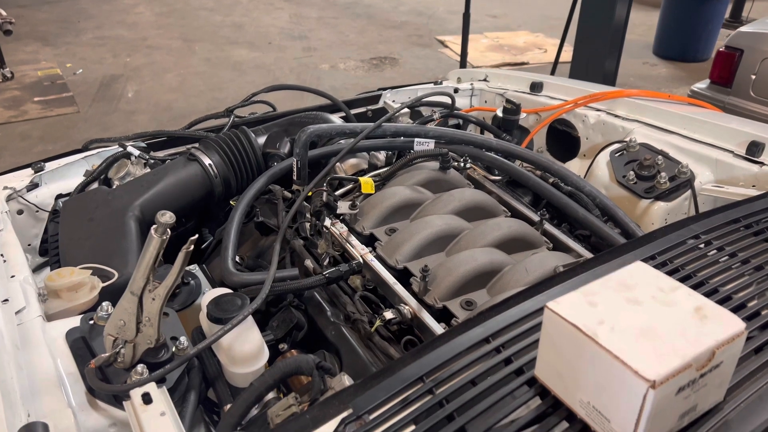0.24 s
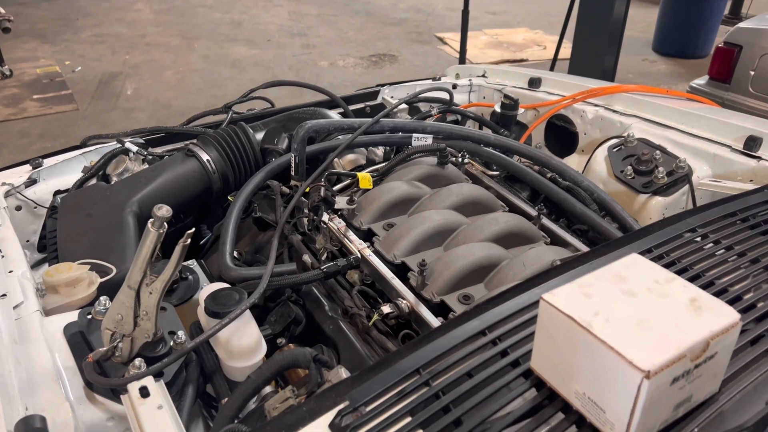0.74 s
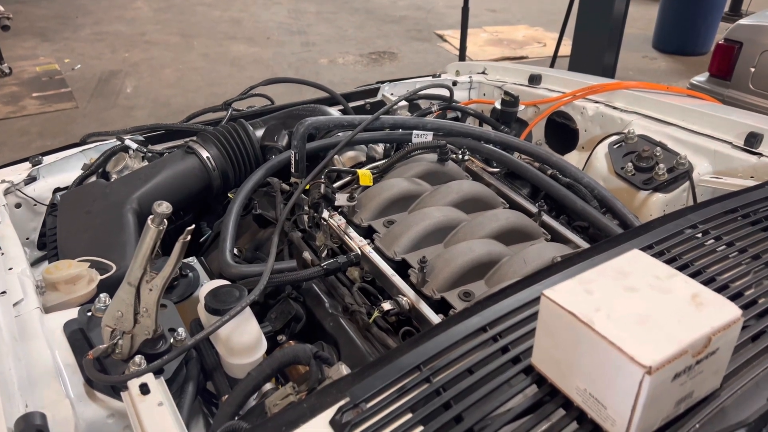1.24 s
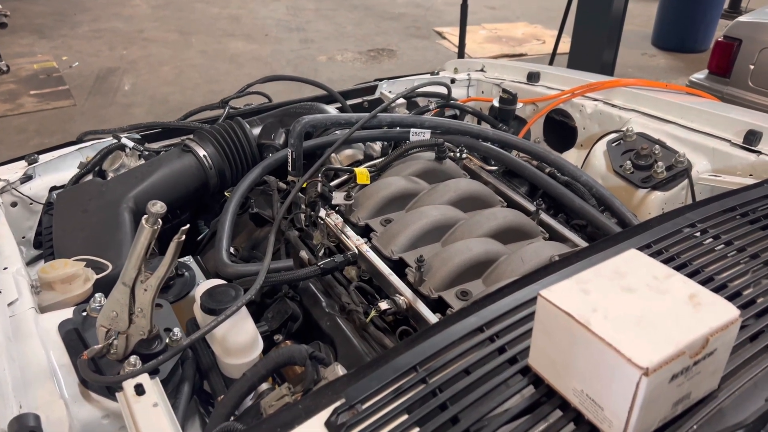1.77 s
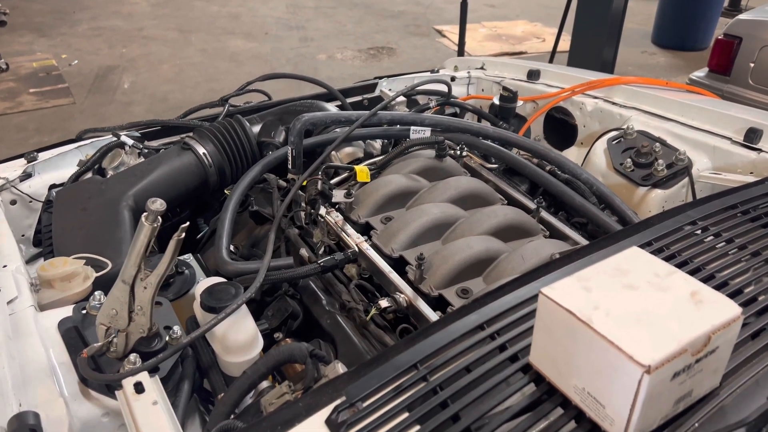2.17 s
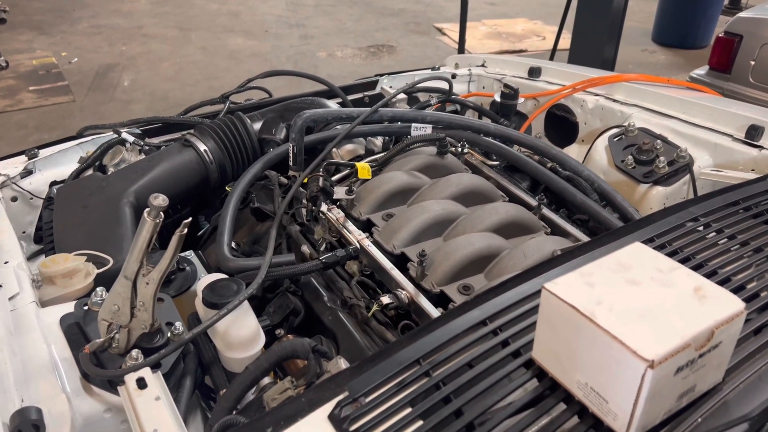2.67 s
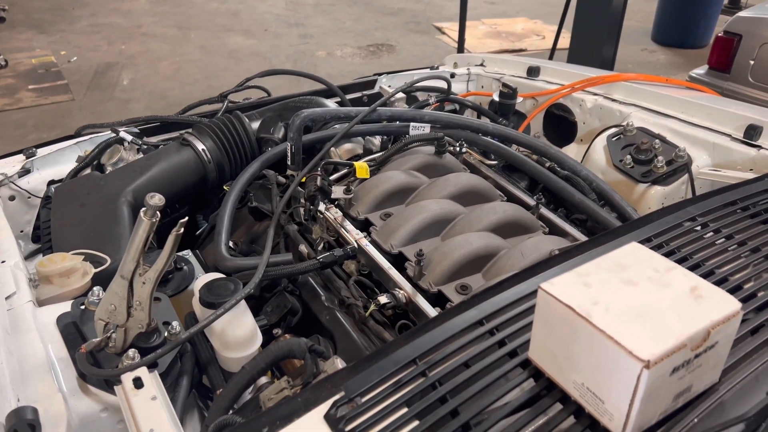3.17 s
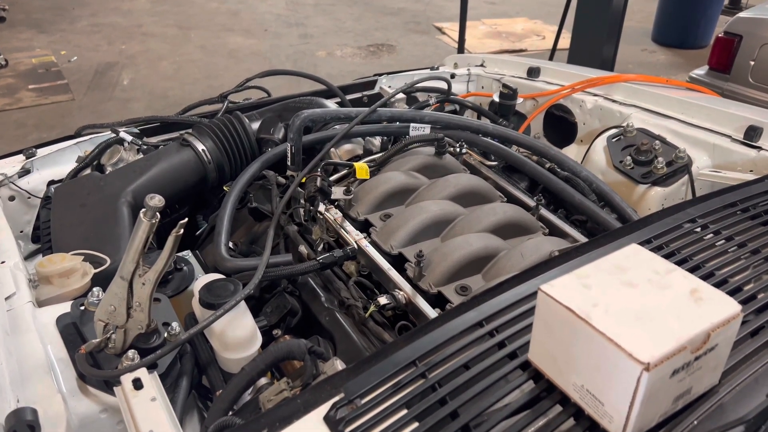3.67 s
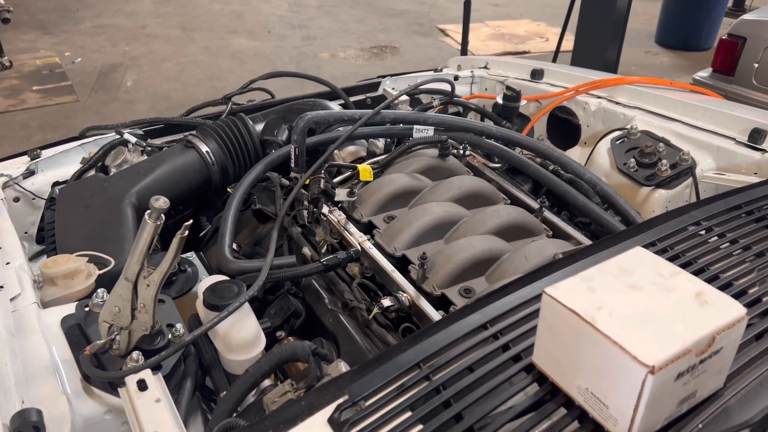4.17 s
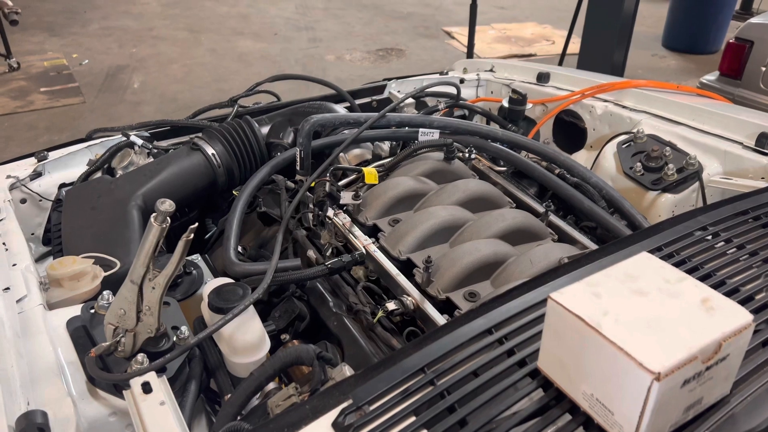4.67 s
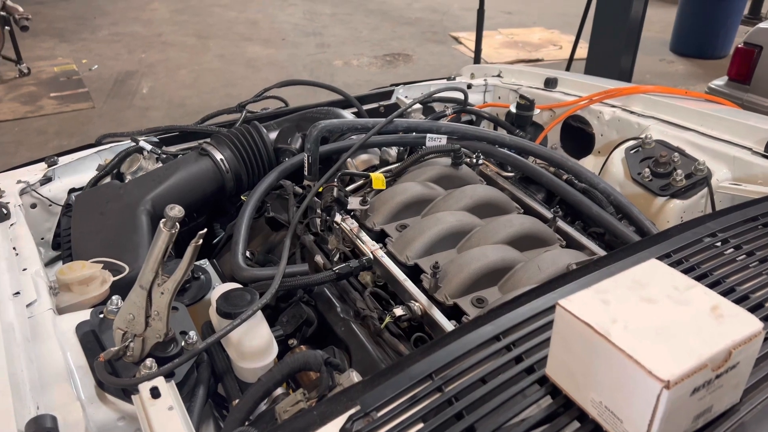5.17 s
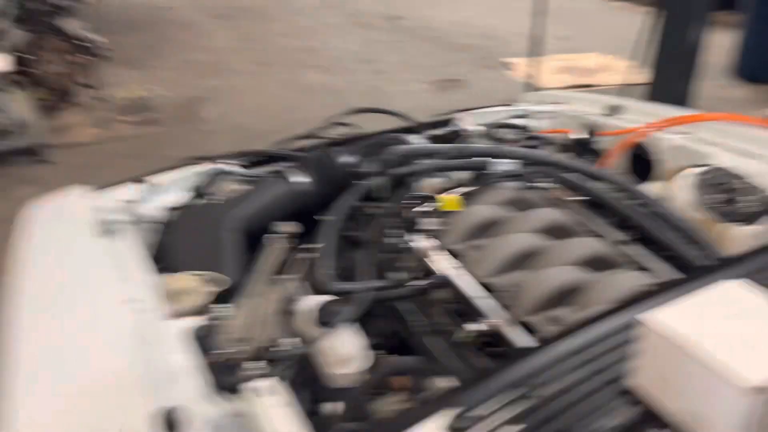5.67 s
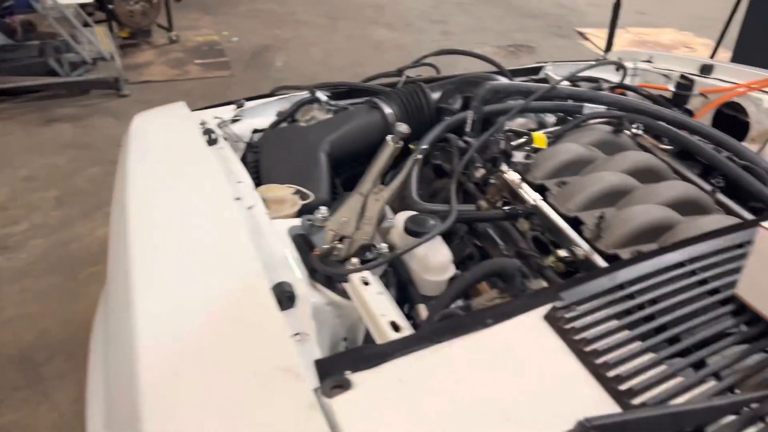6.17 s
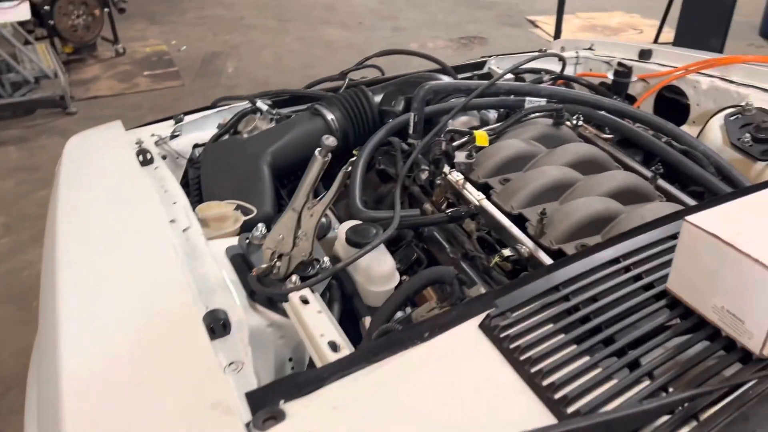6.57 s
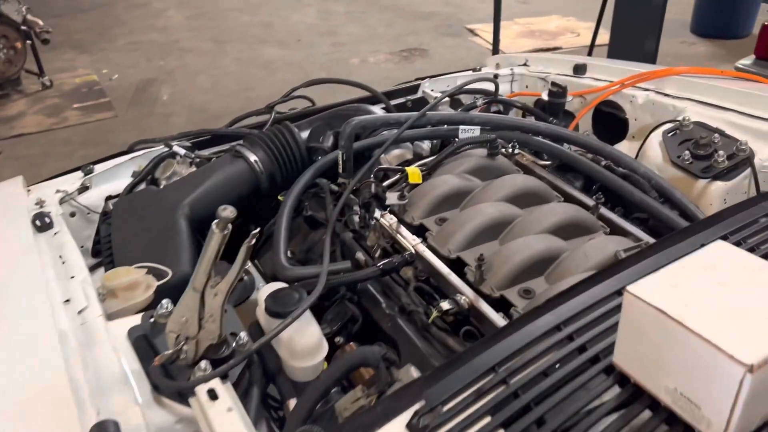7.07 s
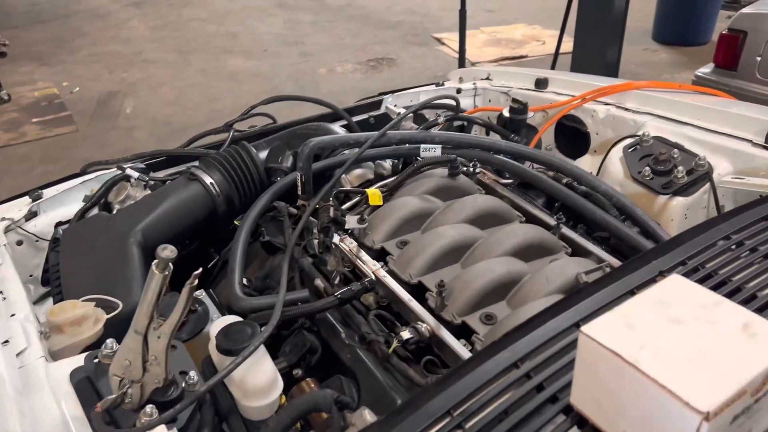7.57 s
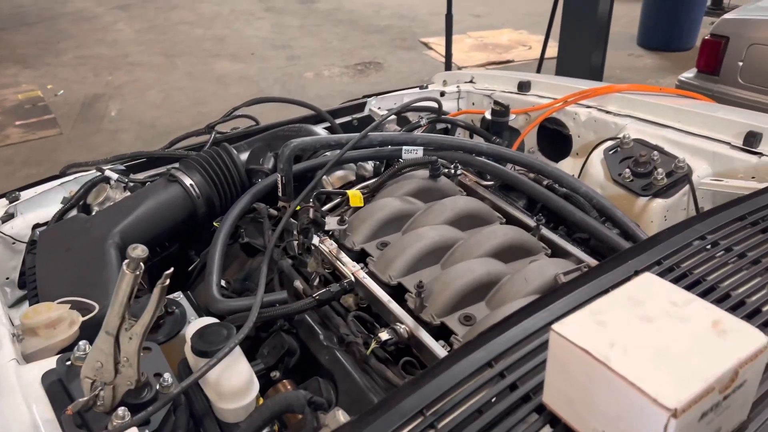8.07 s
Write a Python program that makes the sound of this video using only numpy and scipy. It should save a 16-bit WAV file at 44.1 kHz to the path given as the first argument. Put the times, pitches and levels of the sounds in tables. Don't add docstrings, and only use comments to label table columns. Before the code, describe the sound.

In a garage, a car engine cranks rhythmically for five seconds, sputters, winds down with faint belt whistles, and after a pause is cranked once more.

```python
import sys
import numpy as np
from scipy import signal
from scipy.fft import rfft, irfft, next_fast_len
from scipy.io import wavfile
from scipy.ndimage import uniform_filter1d

SR = 44100
rng = np.random.default_rng(int(sys.argv[2]) if len(sys.argv) > 2 else 0)


def store_pcm(level_fs):
    pcm = np.round(np.clip(level_fs, -1, 1) * 32767).astype(np.int16)
    wavfile.write(sys.argv[1], SR, np.atleast_2d(pcm).T)


def gain_from_decibels(decibels):
    exponent = np.asarray(decibels, float) / 20
    return 10 ** exponent


N = 366912
SIZE = next_fast_len(N + SR)
HZ = np.maximum(np.arange(SIZE // 2 + 1) * SR / SIZE, 1)
T = np.arange(N) / SR
LAG_S = 0.000246

# (time [s], strokes turned [eight make a cycle])
CRANK_TURNS = [(.27, -4.9), (.486, -2.7), (.585, -1.95), (.776, 0), (1.1, 3.835), (1.432, 8), (2.069, 16),
               (2.717, 24), (3.370, 32), (4.024, 40), (4.679, 48), (5.24, 54.85), (5.6, 64), (6.3, 74),
               (8.12, 75.6), (8.32, 77.3)]
# (gear level [dB], intake gulp level [dB], whine level [dB])
CYLINDER_LOADS = [(5.5, 11, -3), (1.5, -1, 1), (-5, -6, 5.5), (-0.5, 6.5, -9), (-2, 4, 4), (-3, 2, -0.5),
                  (-4, -17, -2.5), (-0.5, -3.5, 3.5)]
CYLINDER_LOAD_PLACES = [(-.02, .04), (.98, .95), (1.9, 1.9), (3.03, 2.99), (3.95, 4.04), (5.02, 4.98),
                        (6.06, 6.05), (7.07, 7.05)]
# (time [s], level [dB], pipe ring [Hz], bark level [dB])
ENGINE_FIRINGS = [(5.278, -15, 113, -22), (5.299, -10.5, 107.4, -12), (5.338, -13.5, 77.7, -34),
                  (5.399, -14, 95.4, -27), (5.46, -11, 70.5, -31), (5.51, -12, 92, -44),
                  (5.56, -8.5, 96, -21.5), (5.599, -12.5, 87.5, -22), (5.659, -12.5, 108.7, -30),
                  (5.726, -15, 83, -45), (5.777, -17, 96.6, -40), (5.829, -15, 84.9, -33),
                  (5.869, -13, 86.4, -31), (5.942, -13, 83.6, -33.5), (6.02, -22, 83.2, -42),
                  (6.099, -25.5, 75, -39.5), (6.196, -28.5, 83, -38.5), (6.271, -44, 94.5, -56),
                  (6.349, -42, 96.6, -45)]
# (frequency [Hz], width [Hz], lift
# [dB])
STARTER_MODES = [(255, 20, 5), (410, 40, 3), (672, 40, 4), (841, 28, 11), (1244, 60, 5), (1510, 60, 3),
                 (2810, 80, 5), (3070, 90, 2), (3500, 100, 4.5), (4190, 57, 3), (5290, 100, 2),
                 (6790, 290, 3)]
# (frequency [Hz], left minus right [dB])
LEFT_TILT = [(60, -2.5), (110, 1), (200, -0.5), (550, -0.5), (740, 2.5), (950, 3.5), (1290, 6), (2380, 0.5),
             (4400, 4), (6300, 9), (6850, 9), (7600, 5), (9000, -0.5), (15000, 0.5)]


def on_hz(table):
    hz, value = np.transpose(table)
    return np.interp(np.log(HZ), np.log(hz), value)


def over_time(table):
    return np.interp(T, *np.transpose(table))


def colour(x, gain):
    return irfft(rfft(x, SIZE) * gain, SIZE)[..., :N]


def lift(modes):
    return gain_from_decibels(sum(db / (1 + (2 * (HZ - hz) / width) ** 2) for hz, width, db in modes))


def level(x, db):
    return x * gain_from_decibels(db) / np.sqrt(np.mean(x ** 2))


def add(out, s, x):
    i = int(s * SR)
    out[..., i:i + x.shape[-1]] += x[..., :N - i]


def ring(hz, t60, rise):
    t = T[:int(t60 * SR)]
    return np.sin(2 * np.pi * hz * t) * gain_from_decibels(-60 * t / t60) * (1 - np.exp(-t / rise))


def drift(size, smooth):
    return size * uniform_filter1d(rng.standard_normal(N), smooth)


def slow(s):
    return np.interp(s, [.45, .7, .95], [1.9, 1.6, 1])


def bursts(rows, rise, fall, order=1):
    out, t = np.zeros(N), T[:SR // 2]
    for s, db in rows:
        fade = np.exp(-(t / (fall * slow(s))) ** order)
        add(out, s, gain_from_decibels(db) * (1 - np.exp(-t / rise)) * fade)
    return out


def strokes(place):
    s, turned = np.transpose(CRANK_TURNS)
    at = place + 8 * np.arange(-1, 7)
    at = at[(at > -3.6) & (at < 55.2)]
    return np.interp(at, turned, s)


def each_cycle(rows, spread_db=0, after=0):
    return [(s, db + spread_db * rng.standard_normal())
            for place, db in rows for s in strokes(place) if s > after]


def load_swells(place_column, column):
    rows = [(at[place_column], row[column]) for at, row in zip(CYLINDER_LOAD_PLACES, CYLINDER_LOADS)]
    return each_cycle(rows, 1)


def cyclic(share):
    cycle = .654 * SR
    place = (over_time(CRANK_TURNS) % 8 / 8 * cycle).astype(int)
    share = share * (T < 5.25)
    returning = rng.standard_normal((3, int(cycle) + 1))[:, place]
    return np.sqrt(share) * returning + np.sqrt(1 - share) * rng.standard_normal((3, N))


def late():
    # (frequency [Hz], phase [rad])
    low_mid_lead = [(150, 0), (450, .3), (690, .8), (900, .2), (1300, 0)]
    treble = np.clip(HZ / 1000 - 1, 0, 1)
    return np.exp(1j * on_hz(low_mid_lead) - 2j * np.pi * HZ * LAG_S * treble)


def ports(gate, gain, shared=0, repeat=0):
    # (frequency [Hz], likeness of the ports [0-1])
    likeness = [(60, 1), (290, 0.85), (640, 0.5), (900, 0), (1500, 0.06), (3300, 0.35), (6000, 0),
                (9000, 0.9), (15000, 1)]
    noise = cyclic(repeat) + shared * np.array([[1], [0], [0]])
    common, left, right = rfft(gate * noise, SIZE) * gain
    alike, tilt = np.clip(on_hz(likeness), 0, 1), gain_from_decibels(on_hz(LEFT_TILT) / 2)
    pair = np.sqrt(alike) * common * [late(), HZ ** 0]
    pair = pair + np.sqrt(1 - alike) * np.array([left, right])
    return irfft(pair * [tilt, 1 / tilt], SIZE)[:, :N]


def garage():
    # (frequency [Hz], level [dB per Hz])
    rumble = [(15, -55), (25, -13.5), (53, -8), (91, -14.5), (124, -16.5), (149, -26), (183, -19.5),
              (314, -38), (906, -40), (979, -35.5), (1170, -37.5), (3500, -47), (5820, -45), (12000, -70),
              (15600, -99), (22000, -120)]
    # (frequency [Hz], level [dB])
    hum_lines = [(70.0, -70), (118.4, -62), (1001, -84.5), (1809, -87.5), (2010, -92), (5001, -85),
                 (6002, -90.5), (7004, -88.5)]
    # (time [s], 1 kHz line level [dB], level of the lines above [dB])
    coil_levels = [
        (0, -1, -21),
        (5.9, 8, -19),
        (6.64, 16, -4),
        (6.68, 3, -4),
        (6.9, 5, 2.5),
        (7.7, 2, -4),
        (7.85, -11, -7),
    ]
    swell = uniform_filter1d(np.repeat(rng.standard_normal(N // 8000 + 1), 8000)[:N], 8000)
    s, low_db, high_db = np.transpose(coil_levels)
    hum = 0
    for hz, db in hum_lines:
        coil_db = np.interp(T, s, low_db if hz < 1100 else high_db) * (hz > 500)
        line_db = db + 6.5 + drift(60, 1500) + coil_db
        hum = hum + gain_from_decibels(line_db) * np.sin(2 * np.pi * hz * T)
    return level(ports(gain_from_decibels(0.58 * swell), gain_from_decibels(on_hz(rumble))), -53) + hum


def knocks():
    # (time [s], level [dB], frequency [Hz], t60 [s], left minus right [dB])
    heavy_knocks = [(0.212, -49, 1800, 0.12, 3), (.28, -52, 72, 0.77, -15), (0.667, -33, 1430, 0.16, 2),
                    (5.233, -22, 750, 0.041, 0), (5.233, -29, 1500, 0.045, -2),
                    (5.233, -28, 3020, 0.042, -4), (5.265, -36, 560, 0.046, 5),
                    (5.294, -14, 490, 0.031, 0.5), (5.294, -26, 1270, 0.033, 8),
                    (5.312, -35.5, 1500, 0.19, 7), (5.333, -35, 1090, .05, 2), (5.381, -30, 2000, .04, 0),
                    (5.414, -40, 695, 0.054, 2), (5.464, -29, 1500, 0.04, 2), (.693, -30, 1260, 0.14, 2),
                    (.861, -29, 1190, 0.093, -5), (1.11, -25.5, 560, 0.044, 2), (5.57, -34, 1130, 0.11, 11),
                    (5.712, -30, 1010, 0.053, -2), (6.722, -44, 700, 0.071, 0),
                    (7.92, -60, 789, 0.14, -1.0), (8.313, -36, 1110, 0.12, 8)]
    narrow_scuffs = [(.29, -35.5, 200, .1, 0.5), (.47, -32, 420, 0.16, -1), (.585, -33, 312, 0.075, -1),
                     (8.128, -28, 282, 0.082, -3), (0.219, -45, 520, .1, -2), (8.163, -33, 130, .1, -2),
                     (8.193, -39, 170, 0.068, 0), (8.235, -36, 198, 0.073, 2), (8.275, -36, 190, 0.12, 2),
                     (0.192, -53, 467, 0.3, -4), (5.464, -31, 630, 0.086, 3), (7.218, -60, 1970, 0.41, 2),
                     (7.765, -69, 1700, 0.38, 0), (7.82, -63, 1690, .2, 0)]
    tonal_pings = [(.4, -34.5, 574, 0.23, 0), (.43, -29, 855, 0.19, 1), (.57, -29.5, 660, 0.15, -2),
                   (.6, -29.5, 860, 0.18, 4), (.645, -29.5, 675, .15, 0), (0.66, -38, 665, .12, -1),
                   (8.15, -29, 1090, 0.088, 3), (8.21, -40, 695, .3, -5), (8.215, -36, 432, .25, -5),
                   (8.2, -46, 4200, .3, 7), (5.266, -29, 4760, 0.09, 3), (6.571, -40, 474, 0.1, -2),
                   (6.727, -47, 748, 0.13, 0), (6.727, -49, 465, 0.11, 0), (.217, -41.5, 1150, .07, 9),
                   (6.63, -53.5, 480, .1, 0), (7.24, -70, 1810, 0.66, 0), (8.05, -46, 469, 0.11, -3),
                   (8.05, -65, 7300, .06, 0)]
    t = T[:SR // 2]
    for rows, spread in (heavy_knocks, 0.37), (narrow_scuffs, 0.11), (tonal_pings, 0.033):
        for s, db, hz, t60, pan_db in rows:
            band = signal.butter(2, [hz / (1 + spread), hz * (1 + spread)], "band", fs=SR, output="sos")
            common = rng.standard_normal(len(t))
            hit = signal.sosfilt(band, common + rng.standard_normal((2, len(t))))
            fade = gain_from_decibels(-60 * t / t60) * (1 - np.exp(-t / 0.00059))
            pan = gain_from_decibels(np.array([[pan_db], [-pan_db]]) / 2)
            yield s, level(hit, db) * fade * pan


def hits():
    out = np.zeros((2, N))
    for s, hit in knocks():
        add(out, s, hit)
    return out


def drive():
    # (time [s], level [dB])
    effort = [(.245, -27.5), (.275, -3.5), (.56, -2.5), (.6, -1.5), (1.0, 1), (5.1, -0.74), (5.39, -2),
              (5.5, -5), (5.92, -9.5), (6.17, -19.5), (6.75, -25), (6.95, -30.5), (7.18, -39), (7.4, -47),
              (8.09, -38), (8.128, -4.5), (8.2, -3.5), (8.32, -7)]
    # (level at steady cranking [dB], slope [dB per dB of effort])
    response = [(-29.5, 1.07), (-32.5, 1.34), (-32.5, 1.2)]
    # (time [s], gulp [dB], gear [dB], whirr [dB])
    jolts = [(0.26, -60, -36.5, -26), (.29, -42, -70, -66), (5.36, -27, -52, -37.5), (5.48, -28, -59, -53),
             (.46, -35, -56, -50.5), (5.231, -39, -49, -31), (5.262, -8, -55, -50),
             (5.316, -13.5, -28, -38), (5.597, -18.5, -28.5, -33.5), (5.764, -34, -58, -47),
             (6.2, -44, -66, -64), (8.118, -50, -26.5, -25)]
    effort_db = over_time(effort)
    s, *jolt_columns = np.transpose(jolts)
    out = []
    for (db, slope), jolt_db in zip(response, jolt_columns):
        jolt = bursts(zip(s, jolt_db), 0.011, 0.023, order=2)
        out.append(20 * np.log10(gain_from_decibels(db + slope * effort_db) + jolt))
    return out


def throb(column, rise, fall, rest_db):
    # (time [s], throb depth [0-1])
    throb_depth = [
        (.37, 0.16),
        (.49, 0),
        (.56, 0.75),
        (1.0, 0.78),
        (5.1, 0.6),
        (5.25, 0.6),
        (5.9, 0),
        (6.75, 0.4),
    ]
    rows = load_swells(0, column) + [(s, -3) for s, *_ in ENGINE_FIRINGS]
    swell = gain_from_decibels(rest_db) + bursts(rows, rise, fall, order=2)
    steady = swell / np.sqrt(uniform_filter1d(swell ** 2, SR // 5))
    return steady ** np.clip(over_time(throb_depth), 0, 1.5)


def tooth_phase(sag):
    # (time [s], rate [Hz])
    tooth_rate = [
        (.27, 190),
        (.44, 280),
        (.63, 282),
        (.74, 310),
        (.86, 415),
        (2, 421),
        (3.5, 417),
        (5.3, 420),
        (8.1, 190),
        (8.32, 290),
    ]
    strain = sag * np.cos(2 * np.pi * (over_time(CRANK_TURNS) - .03))
    wander = .2 * uniform_filter1d(cyclic(.7)[0], 900)
    return np.cumsum(over_time(tooth_rate) * (1 + strain + wander)) / SR


def machine(mesh):
    # (frequency [Hz], level [dB per Hz])
    gulp_spectrum = [(65, -10.5), (110, -3.5), (156, -14), (204, -4), (258, -15), (345, -12.5), (424, -18),
                     (465, -12), (600, -22.5), (780, -39.5), (1320, -120)]
    gear_spectrum = [(290, -34.5), (500, -12), (766, -2.5), (834, -7), (903, -3), (1010, -2), (1260, 2.5),
                     (2400, -8), (3120, -56.5), (5280, -120)]
    whirr_spectrum = [(1200, -7.5), (2000, -4), (3500, -5.5), (5400, -7.5), (8000, -12), (11500, -16),
                      (13000, -26.5), (14500, -26), (15600, -14), (16000, -47), (17000, -82.5)]
    # (frequency [Hz], width [Hz], lift [dB])
    cover_modes = [(2320, 13, -10.5), (2650, 46, 4.5), (3320, 50, 4), (3820, 35, 3), (4060, 200, -3),
                   (4440, 44, 0), (5300, 30, 5), (5500, 60, 3.5), (6480, 97, 4), (7270, 280, -5)]
    # (frequency [Hz], width [Hz], lift [dB])
    free_modes = [(190, 210, 3.5), (700, 89, 8), (1440, 31, 5.5), (2000, 40, 0.5), (5960, 1300, 1.5),
                  (9140, 1000, 2.5), (12000, 3000, 3.5), (15100, 1500, 7)]
    # (frequency [Hz], width [Hz])
    dropped_bands = [(10250, 1000), (13700, 1150)]
    meshed = uniform_filter1d(1. * ((T < 5.3) | (T > 8)), 2000)
    mesh = mesh + 2.3 * uniform_filter1d(cyclic(.8)[0], 200)
    teeth = level(np.diff(np.floor(mesh), prepend=0) > 0, 0.84)
    rattle = 3.6 * cyclic(1)[0]
    gaps = np.prod([np.clip(np.abs(2 * (HZ - hz) / width), .02, 1) ** 8 for hz, width in dropped_bands], axis=0)
    parts = ((gulp_spectrum, throb(1, 0.002, 0.088, -14.5), rattle, .85),
             (gear_spectrum, throb(0, 0.008, 0.038, -19), teeth, .8),
             (whirr_spectrum, throb(0, 0.011, 0.031, 1.3), 0, .35))
    out = 0
    for (spectrum, gate, shared, repeat), db in zip(parts, drive()):
        gain = gain_from_decibels(on_hz(spectrum)) * gaps
        driven = level(ports(gate, gain * lift(STARTER_MODES + cover_modes), shared, repeat), 0)
        free = level(ports(gate, gain * lift(free_modes)), 0.5)
        out = out + gain_from_decibels(db) * (meshed * driven + (1 - meshed) * free)
    return out


def clang():
    # (time [s], level [dB])
    engagements = [
        (.266, -19.5),
        (8.121, -22.5),
    ]
    # (frequency [Hz], width [Hz], level [dB])
    gear_modes = [(626, 60, -5), (980, 64, 3), (1290, 70, -13), (1520, 50, -0.5), (1900, 70, -4),
                  (2200, 60, -2.5), (2753, 90, -6), (3500, 50, -4.5)]
    modes = sum(gain_from_decibels(db) / (1 + 2j * (HZ - hz) / width) for hz, width, db in gear_modes)
    return 5 * ports(bursts(engagements, 0.007, 0.016, order=2), modes)


def thuds():
    # (place [strokes], frequency [Hz],
    # level [dB], t60 [s])
    struck_modes = [(0.018, 215, -34, 0.14), (0.048, 683, -26.5, 0.083), (0.052, 396, -33.5, 0.085),
                    (1.05, 390, -36.5, .1), (1.001, 209.8, -37, .15), (2.15, 229, -29, 0.13),
                    (2.2, 390.4, -32.5, 0.15), (2.952, 374.4, -36.5, 0.14), (3.0, 662, -44.5, 0.033),
                    (4.0, 200.2, -25, 0.23), (3.998, 637, -34.5, 0.17), (4.049, 421, -25, 0.09),
                    (4.949, 212, -32, 0.13), (6.15, 403, -34, 0.36), (7.15, 398, -36, 0.25),
                    (2.1, 45.8, -17, 0.14), (5.9, 48, -30, .2), (0, 135.7, -29, 0.22),
                    (4.9, 135, -28.5, .25),
                    (.06, 920, -43, 0.068), (0.094, 220, -31.5, 0.094), (0.099, 1740, -29.5, .1),
                     (.25, 720, -31, 0.12), (1.05, 1380, -33, 0.1), (1.4, 477, -32.5, 0.082),
                     (1.2, 1270, -35, .08), (1.049, 2800, -32, .08), (2.1, 1400, -31.5, 0.11),
                     (2.5, 1135, -29.5, 0.14), (3.05, 290, -38, .08), (2.5, 2700, -35, .08),
                     (3.9, 630, -32.5, 0.066), (3, 620, -36, .07), (3.4, 970, -35.5, .1),
                     (4.1, 1248, -31, 0.13), (4.149, 1100, -31, 0.21), (6.2, 1600, -37, 0.087),
                     (4.1, 280, -30.5, 0.075), (5.3, 1900, -31, 0.15), (6.15, 1222, -36.5, .08),
                     (6.35, 1300, -36.5, 0.14), (7.05, 1600, -31, .06), (7.35, 1600, -43, 0.065),
                     (1.5, 276, -33.5, 0.17), (1.0, 140, -31, 0.17), (2.3, 160, -32.5, 0.15),
                     (3.1, 170, -33.5, 0.18), (5.9, 160, -33, 0.14), (6.2, 260, -35.5, 0.13),
                     (7.1, 290, -33.5, 0.11), (7.0, 150, -34, .2), (4.7, 800, -30, .07),
                     (0.021, 2280, -39, .04), (5.27, 2260, -41.5, .04)]
    out = np.zeros(N)
    for place, hz, db, t60 in struck_modes:
        for s in strokes(place):
            note = hz * (1 + 0.014 * rng.standard_normal())
            add(out, s, gain_from_decibels(db + 1.5 * rng.standard_normal()) * ring(note, t60, t60 / 50))
    return out


def whine(teeth):
    # (multiple of tooth rate, level [dB])
    pinion_tones = [(1, -40), (3, -45.5), (3.6, -41)]
    # (multiple of tooth rate, level [dB])
    armature_tones = [(6.72, -48.5), (7.35, -52), (7.9, -56.5), (8.4, -46.5), (10.05, -54.5)]
    load = bursts(load_swells(0 + 1, 2), 0.016, 0.037, order=4)
    armature = tooth_phase(.013)
    pinion = sum(gain_from_decibels(db) * np.sin(2 * np.pi * k * teeth) for k, db in pinion_tones)
    song = sum(gain_from_decibels(db + drift(86, 500)) * np.sin(2 * np.pi * k * armature) for k, db in armature_tones)
    tones = (load + 0.017) * pinion + song / (1 + load) ** 2 / slow(T) ** 2
    return colour(tones * (T > .27) * (T < 5.3), lift(STARTER_MODES))


def bell_housing():
    # (place [strokes], level [dB])
    bell_swells = [(.08, -35), (.98, -33), (1.95, -29), (3.03, -35.5), (4.1, -31.5), (5.08, -34),
                   (6.12, -33), (7.1, -32.5)]
    swell = bursts(each_cycle(bell_swells, 1, after=.8), 0.0063, 0.032, order=4)
    hz = 840 * (1 + drift(0.146, 600))
    return swell * np.sin(2 * np.pi * np.cumsum(hz) / SR)


def block(teeth):
    tilt = gain_from_decibels(on_hz(LEFT_TILT) / 2)
    return colour(thuds() + whine(teeth) + bell_housing(), np.array([tilt * late(), 1 / tilt]))


def exhaust():
    # (frequency [Hz], t60 [s])
    pipe_modes = [(64.6, .31), (71.8, .37), (92.3, .34)]
    # (long pipe puff [dB], middle [dB], short [dB])
    puff_levels = [(-21, -24, -24), (-22, -17, -23), (-17, -17, -25), (-21, -13, -20), (-24, -18, -18),
                   (-15, -15, -26), (-13, -23, -22), (-17, -34, -16)]
    puff_places = [(0.23, 0.3, -0.21), (1.29, 1.03, 0.76), (2.05, 2.29, 2.31), (3.12, 3.0, 3.17),
                   (4.0, 4.08, 3.76), (4.81, 4.95, 5.16), (6.04, 5.81, 6.3), (7.03, 7.22, 6.89)]
    # (time [s], level [dB])
    choke = [
        (.37, 4),
        (.494, -4),
        (.572, -1),
        (.59, 1.1),
    ]
    puffs, fired = np.zeros((2, N))
    for places, row in zip(puff_places, puff_levels):
        for (hz, t60), place, puff_db in zip(pipe_modes, places, row):
            for s, db in each_cycle([(place, puff_db)], 0.8):
                add(puffs, s, gain_from_decibels(db) * ring(hz, t60, 0.016))
    for s, peak_db, hz, bark_db in ENGINE_FIRINGS:
        add(fired, s - .01, gain_from_decibels(peak_db + 2.0) * ring(hz, 0.35, 0.005))
        bark_hz = 255 * (1 + 0.071 * rng.standard_normal())
        add(fired, s, gain_from_decibels(bark_db - 3.5) * ring(bark_hz, 0.3, 0.0035))
    pipes = level(puffs, -28.0) * gain_from_decibels(over_time(choke)) + fired
    return np.array([gain_from_decibels(1.3) * np.roll(pipes, -9), gain_from_decibels(2.0) * pipes])


def valve_ticks():
    # (place [strokes], level [dB], 7 kHz ring [dB])
    cycle_ticks = [
        (-.01, -20.5, -23.5),
        (2.815, -19, -23.5),
        (5.28, -24.5, -23.5),
    ]
    # (time [s], level [dB], 7 kHz ring [dB])
    loose_ticks = [
        (5.271, -18.5, -30.5),
        (5.337, -24, -35),
        (5.4167, -29.5, -35),
        (5.503, -27.5, -31),
        (5.5936, -27.5, -36),
        (5.6585, -25, -39.5),
        (5.764, -26.5, -45),
        (8.311, -24.5, -30),
    ]
    # (frequency [Hz], level [dB per Hz])
    tick_spectrum = [(800, 0.5), (2000, 4), (4000, -5.5), (7000, 2.5), (7600, -6), (9000, -2.5),
                     (10200, -5), (12000, -4), (14000, -11), (15500, -3.5), (16600, -34), (17000, -66)]
    # (frequency [Hz], level against the 7 kHz ring [dB], t60 [s])
    tick_modes = [(1240, -16.5, 0.057), (2300, -13, 0.015), (3470, -15, 0.076), (4790, -8, 0.0425),
                  (11070, -2, 0.021), (12000, -2.5, 0.016), (12500, -12.5, 0.017), (12400, -19, 0.013),
                  (14770, -6.5, .02), (15580, -15.5, 0.0196)]
    # (place [strokes], level [dB])
    gas_spits = [
        (.03, -39),
        (2.9, -32),
    ]
    ticks = [(s, db, ring_db) for place, db, ring_db in cycle_ticks for s in strokes(place)] + loose_ticks
    cracks = [row[:2] for row in ticks]
    spectrum = gain_from_decibels(on_hz(tick_spectrum))
    out = ports(bursts(cracks, 0.00038, 0.0074), level(spectrum, 0), repeat=.9)
    out += ports(bursts(each_cycle(gas_spits), .003, 0.012), level(spectrum * HZ / 8000, 0))
    out += ports(bursts(cracks, 0.0041, .03), gain_from_decibels(-22) / (1 + ((HZ - 15100) / 700) ** 4))
    shell = sum(gain_from_decibels(db) * np.pad(ring(hz, t60, 0.00034), (0, 3000))[:3000] for hz, db, t60 in tick_modes)
    shell = np.array([np.roll(shell, round(LAG_S * SR)), shell])
    for s, _, db in ticks:
        add(out, s, gain_from_decibels(db + 2.0) * shell)
        add(out, s, gain_from_decibels(db + np.array([[6], [-2]])) * ring(6800, 0.022, 0.00058))
    return out


def rocker_clacks():
    # (place [strokes], level [dB])
    clack_places = [
        (3.98, -30),
        (6.79, -32),
    ]
    # (frequency [Hz], level [dB per Hz])
    clack_spectrum = [(300, -25), (520, 12), (850, -5.5), (1400, 5), (2200, -10.5), (2900, -1), (5000, -27)]
    gate = bursts(each_cycle(clack_places, 1, after=.8), 0.00037, 0.0072)
    return ports(gate, level(gain_from_decibels(on_hz(clack_spectrum)), 0) * 3, repeat=.9)


def belt_whistles():
    # (start [s], end [s], start pitch [Hz], end pitch [Hz], level [dB])
    glides = [
        (6.08, 6.5, 7500, 4400, -64.5),
        (6.18, 6.4, 9800, 7700, -64),
        (6.46, 6.68, 6400, 5200, -68),
        (6.4, 6.74, 730, 715, -67),
        (6.42, 6.65, 2005, 2000, -68),
        (6.2, 6.74, 1450, 1460, -69),
    ]
    out = np.zeros(N)
    for start, end, top_hz, low_hz, db in glides:
        share = np.clip((T - start) / (end - start), 0, 1)
        hz = top_hz * (low_hz / top_hz) ** share * (1 + drift(.2, 300))
        out += gain_from_decibels(db) * np.sin(np.pi * share) * np.sin(2 * np.pi * np.cumsum(hz) / SR)
    return out


def echo(near):
    t60_s, gap_s = 0.45, .012
    tail = rng.standard_normal((2, SR)) * gain_from_decibels(-60 * T[:SR] / t60_s) * (T[:SR] > gap_s)
    return colour(near, rfft(level(tail, -14) / np.sqrt(SR), SIZE) / (1 + HZ / 6000))


def scene():
    teeth = tooth_phase(.035)
    near = hits() + machine(teeth) + clang() + block(teeth)
    near = near + valve_ticks() + rocker_clacks() + belt_whistles()
    return near + echo(near) + exhaust() + garage()


def band_limit(x):
    return signal.sosfilt(signal.butter(12, 17140, fs=SR, output="sos"), x)


def record(dry):
    trimmed = colour(dry, 1 / (1 + (35 / HZ) ** 4))
    return band_limit(np.tanh(1.22 * trimmed) / 1.377)


dry = scene()
out = record(dry)
store_pcm(out)
```